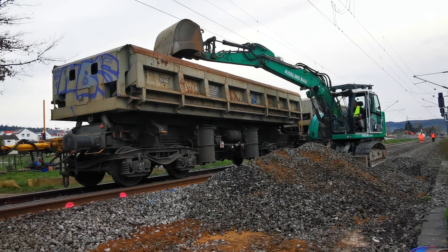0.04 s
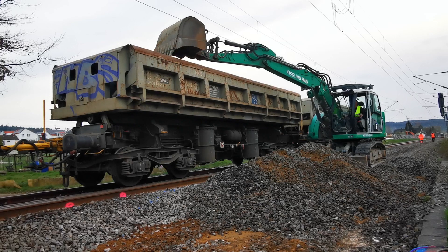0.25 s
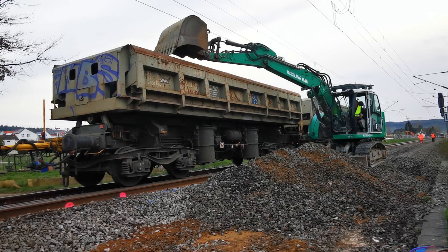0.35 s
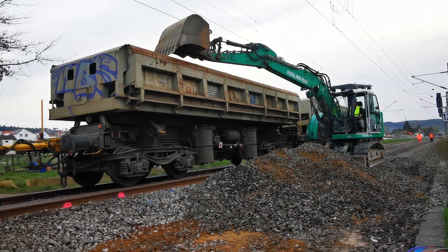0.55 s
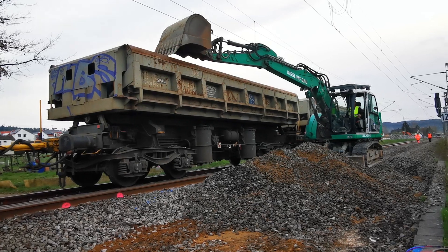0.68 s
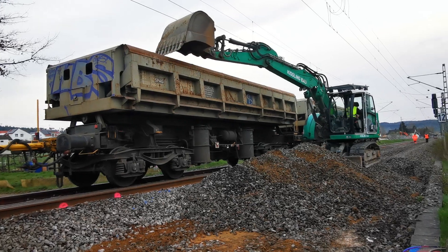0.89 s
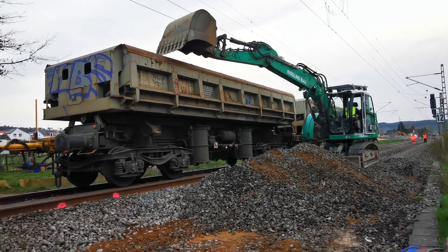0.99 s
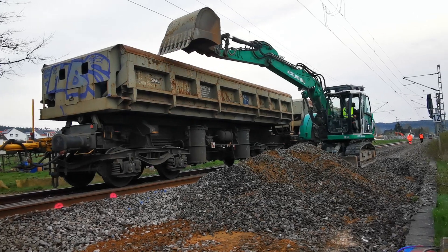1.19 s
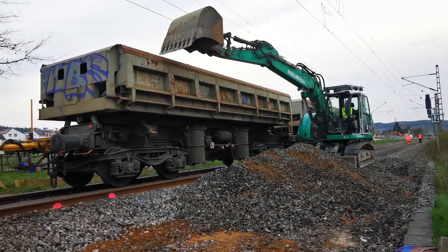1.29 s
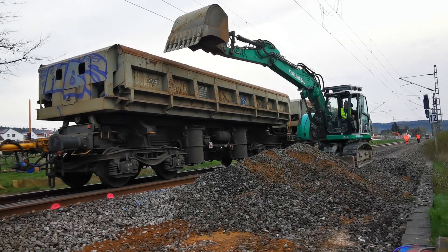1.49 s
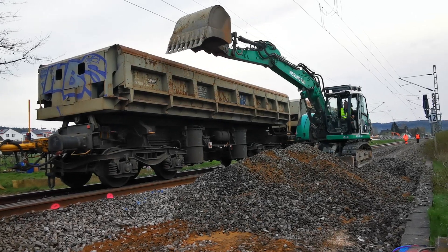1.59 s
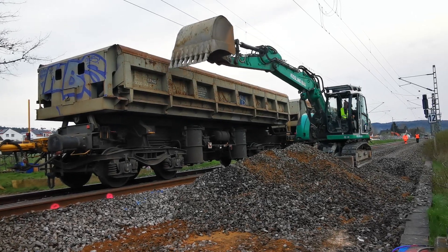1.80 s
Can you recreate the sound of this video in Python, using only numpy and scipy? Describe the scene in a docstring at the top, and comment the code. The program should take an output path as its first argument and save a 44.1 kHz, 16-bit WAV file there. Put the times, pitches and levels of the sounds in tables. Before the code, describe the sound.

Stones slide softly from an excavator bucket, then crash into an empty steel wagon with a boom and ringing clang. A few last stones rattle out while a diesel engine idles faintly, outdoors and slightly to the left.

```python
"""A soft slide of stones, then a clatter: an excavator tips track ballast into an empty steel wagon.
The bulk lands in two heavy loads that make the floor boom and the walls clang, and the last stones
ring in the bucket. Hails of tiny impacts drive the steel's modes and bands of dense ringing.
Underneath, a diesel engine idles and the hydraulics whine faintly. All is outdoors, a little to the left."""
import sys
import numpy as np
from scipy import signal
from scipy.fft import rfft, irfft, next_fast_len
from scipy.io import wavfile

SR = 44100
rng = np.random.default_rng(int(sys.argv[2]) if len(sys.argv) > 2 else 0)


def digitize_waveform(pressure):
    """Quantize a signal to 16-bit integers and store it at the path in sys.argv[1].

    Rows of a 2-D input are taken as channels; values are limited to [-1, 1].
    """
    field = np.atleast_2d(pressure).T
    bounded = np.clip(field, -1, 1)
    quanta = np.round(bounded * 32767).astype(np.int16)
    wavfile.write(sys.argv[1], SR, quanta)


N = 81585
T = np.arange(N) / SR

# masses of ballast landing in the wagon: start_s, rise_s, fade_db_per_s, floor_db, wall_db
LOADS = [(0.21, 0.03, 35, -48, -34), (.289, 0.0049, 78, -41, -29.5), (0.319, 0.01, 69, -15, -20),
         (0.434, 0.0017, 55.5, -15, -18.5), (0.528, 0.029, 59, -15.5, -24.5), (.799, 0.0033, 110, -54, -45),
         (0.848, 0.0067, 117, -27.5, -38), (0.919, 0.0065, 132, -54, -27)]
# lasting tones of the steel plates: pitch_hz, level_db, t60_s
FLOOR_MODES = [(57, -4.5, 0.21), (74.5, -7, .35), (100.5, -12.5, 0.54), (115.1, -6.5, 0.49),
               (173, -7.5, 0.27), (205.8, 0.5, 0.48), (223.5, 2, 0.61), (262.2, -4, .3), (301.4, -4, 0.31)]
WALL_MODES = [(470.4, 5, 1), (557.7, 8, 0.85), (584, 9.5, 0.2), (642, -9, .5), (772, -4, 0.85),
              (864, 1, 0.13), (930, -24, .4), (970, -9, .5), (1030, 2.5, 0.2), (1115, 0.5, 0.56),
              (1304, 2.5, 0.17), (1320, -10, .3), (1570, -13, 0.14), (1980, -9, 0.39)]
# dense wash of ringing around those tones: freq_hz, density_db
FLOOR_SPECTRUM = [(30, -35), (52, -9), (85, -10), (115, 5), (150, -7), (230, 4), (300, -2), (390, -12),
                  (600, -43)]
WALL_SPECTRUM = [(200, -20), (330, -0.5), (430, -6), (580, 5.5), (680, 4.5), (850, -0.5), (1150, -10),
                 (1700, -21), (3000, -26)]

def wagon():
    """The body of the crash: each load drums on the floor and clangs on the walls."""
    floor = flow([(s, rise, fade, db) for s, rise, fade, db, _ in LOADS])
    wall = flow([(s, rise, fade, db) for s, rise, fade, _, db in LOADS])
    boom = plate(FLOOR_SPECTRUM, FLOOR_MODES, lambda hz: floor, ring_db=-6.5)
    clang = plate(WALL_SPECTRUM, WALL_MODES, lambda hz: wall, ring_db=-6.5)
    return boom + clang


# big lumps hitting the floor: start_s, level_db
THUMPS = [(0.33, -12), (.350, -12), (0.439, -12), (.866, -19)]

def thumps(push_s=0.0063, radiates_above_hz=34):
    """The low-end weight: big lumps give the floor a soft push that sets all its modes going."""
    push = sum(from_db(db) * np.sin(np.pi * np.clip((T - s) / push_s, 0, 1)) ** 2 for s, db in THUMPS)
    push *= 2 / (push_s * SR)   # each pulse's area equals its gain
    boom = sum(from_db(db) * ring(push, hz, t60) for hz, db, t60 in FLOOR_MODES)
    return signal.sosfilt(signal.butter(2, radiates_above_hz, "high", fs=SR, output="sos"), boom)


# single big stones striking a wall: start_s, level_db, brightness_db_per_octave
CRACKS = [(.210, -35.5, 8), (.293, -25, 0.5), (0.324, -16.5, -4), (0.435, -16, 1), (0.8, -29, -19),
          (0.826, -26.5, -12), (0.919, -23, -11), (.957, -48, 5.5)]
# tone colour of a crack: freq_hz, density_db
CRACK_SPECTRUM = [(250, 2), (400, -11), (620, 3.5), (1200, -3.5), (2500, -18), (3400, -8), (4400, -9.5),
                  (5500, -31), (7200, -34), (10000, -73)]

def cracks(rise_s=0.0024, fade_db_per_s=420, tilt_above_hz=610):
    """The attack: big stones hit the wall in short bursts, from a bright clink to a dull knock."""
    def envelope(hz):
        octaves = np.log2(max(hz / tilt_above_hz, 1))
        return flow([(s, rise_s, fade_db_per_s, db + bright * octaves) for s, db, bright in CRACKS])
    return banded(CRACK_SPECTRUM, 0.75, envelope)


# showers of stone: start_s, rise_s, fade_db_per_s, level_db, brightness_db_per_octave
SPILLS = [(0.205, 0.011, 116, -23.5, 1), (0.25, 0.0092, 105, -29.5, 5.5), (0.288, 0.0054, 88, -21.5, -6),
          (0.319, 0.0091, 100, -19, -5.5), (.358, 0.011, 185, -25.5, 1.5), (0.432, 0.0023, 111, -18.5, 0),
          (0.472, 0.0066, 132, -23, 5), (0.519, 0.022, 109, -27.5, -6), (0.864, 0.011, 95, -48.5, 5.5),
          (0.913, 0.0052, 151, -39.5, -3.5), (0.953, 0.0027, 226, -53.5, 12)]
# clinks of stone on steel: pitch_hz, level_db, t60_s
CLINK_MODES = [(1138, -9, .1), (1408, 0, 0.05), (2260, -5, 0.023), (2815, 8.5, 0.043), (4070, -11, 0.02),
               (4280, -1, 0.024)]
# puffs of fine grit: start_s, rise_s, fade_db_per_s, level_db
GRIT_PUFFS = [(.288, 0.0057, 102, -34.5), (.355, .015, 146, -51), (.48, 0.035, 140, -42),
              (.868, 0.018, 90, -55.5)]
# tone colours of rattling stone and hissing grit: freq_hz, density_db
STONE_SPECTRUM = [(400, -18.5), (900, -4), (1400, 1.5), (1900, -3.5), (3000, -2), (4500, -4), (5500, -20.5),
                  (7200, -14.5), (9000, -28.5), (12000, -40), (15500, -58)]
GRIT_SPECTRUM = [(4000, -8), (7000, 7.5), (9500, -3), (13000, -1.5), (16000, -19)]

def clatter(pivot_hz=2315, fade_exponent=0.36):
    """Stones rattle on steel and each other; the treble dies first as the heap cushions them."""
    def envelope(hz):
        ratio = hz / pivot_hz   # a spill's fade and level hold at the pivot and tilt around it
        return flow([(s, rise, fade * ratio ** fade_exponent, db + bright * np.log2(ratio))
                     for s, rise, fade, db, bright in SPILLS])
    stones = plate(STONE_SPECTRUM, CLINK_MODES, envelope, ring_db=-10)
    puffs = flow(GRIT_PUFFS)
    grit = banded(GRIT_SPECTRUM, 1, lambda hz: puffs)
    return inside_wagon(stones + grit)


def inside_wagon(dry, t60_s=0.044, echo_db=-2):
    """Quick reflections between the steel walls blur each contact."""
    age = T[:SR // 8]
    tail = rng.standard_normal(len(age)) * np.exp(-np.log(1000) * age / t60_s)
    echoes = signal.fftconvolve(dry, tail[None] / np.linalg.norm(tail))[:, :N]
    wet = from_db(echo_db)
    return (dry + wet * echoes) / np.sqrt(1 + wet ** 2)


# tone colour of stones sliding in the bucket: freq_hz, density_db
SLIDE_SPECTRUM = [(300, -28), (700, -1), (2000, -6), (4500, -10), (5600, -45), (7200, -23), (11000, -43)]
# level curve of the slide: time_s, level_db
SLIDE_LEVEL = [(0, -44.5), (.04, -50.5), (.12, -51.5), (.2, -51.5), (.6, -54)]
# the last stones scraping out: start_s, rise_s, fade_db_per_s, level_db
LAST_STONES = [(.80, 0.012, 75, -29), (.916, 0.007, 60, -31.5), (.955, 0.01, 148, -28.5),
               (1.085, 0.017, 400, -56)]
# hollow tones of the bucket: pitch_hz, level_db, t60_s
BUCKET_MODES = [(116, 2, 0.22), (186.3, -0.5, .25), (563, -4, 0.18), (630.3, -3.5, 0.17),
                (655.5, -6.5, 0.14)]

def bucket():
    """Ballast slides as the bucket tips; nearly empty, it rings hollow under the last stones."""
    slide, scrape = in_time(SLIDE_LEVEL), flow(LAST_STONES)
    return banded(SLIDE_SPECTRUM, contacts(), lambda hz: slide) + pelted(BUCKET_MODES, lambda hz: scrape)


# harmonics of the engine's hum: firing_multiple, level_db
ENGINE_ORDERS = [(1, -59), (2, -54.5), (3, -70.5), (6, -68)]
# engine noise and hiss: freq_hz, density_db
ENGINE_SPECTRUM = [(18, -36), (30, -9.5), (75, 0.5), (88, -4), (97, -13), (117, -7), (152, -2.5),
                   (225, -9.5), (249, -16), (341, -4), (432, -20), (492, -7.5), (591, -15), (639, -19),
                   (691, -5), (747, -21.5), (921, -24), (1770, -17.5), (2360, -31), (4310, -47),
                   (5450, -26.5), (7260, -25.5), (15500, -33)]

def diesel(firing_hz=37.4, wander=0.012, throb_db=7, knock_depth=0.52, noise_db=-50.5):
    """An idling diesel: a throbbing hum, and noise that pulses with each firing under a steady hiss."""
    phase = 2 * np.pi * np.cumsum(firing_hz * (1 + wander * drift(8.56))) / SR
    hum = sum(from_db(db + throb_db * drift(8.97)) * np.sin(order * phase + rng.uniform(0, 2 * np.pi))
              for order, db in ENGINE_ORDERS)
    knock = 1 + knock_depth * np.sin(phase)
    noise = banded(ENGINE_SPECTRUM, 0.89, lambda hz: knock if hz < 5000 else 1)
    return np.sqrt(2) * hum + from_db(noise_db) * noise


# level curve of the pump: time_s, level_db
WHINE_LEVEL = [(0, -72), (1.0, -63), (1.3, -57), (1.85, -58)]

def hydraulic_pump(pitch_hz=747, wander=0.0029):
    """The pump's thin, slightly wavering whine creeps up in level."""
    phase = 2 * np.pi * np.cumsum(pitch_hz * (1 + wander * drift(26.1))) / SR
    return np.sqrt(2) * in_time(WHINE_LEVEL) * np.sin(phase)


# tone colour of the valves: freq_hz, density_db
CHATTER_SPECTRUM = [(1100, -24), (1500, -15), (1950, 19), (2500, -21), (3800, -37), (4500, 15.5),
                    (5200, -34)]

def valve_chatter(level_db=-65, swing_db=5.5):
    """Valves chatter faintly: two bright peaks of noise that flicker unevenly."""
    flicker = from_db(level_db + swing_db * drift(per_s=27))
    return banded(CHATTER_SPECTRUM, 0.9, lambda hz: flicker)


def plate(spectrum, modes, envelope, ring_db):
    """A pelted steel plate: dense ringing and a few distinct modes."""
    return banded(spectrum, contacts(), envelope) + from_db(ring_db) * pelted(modes, envelope)


def contacts(stones_per_s=3500, spread_db=1.5):
    """A random hail of stone contacts of uneven size; rms 1."""
    sizes = from_db(spread_db * np.minimum(rng.exponential(1, N), 4))
    hail = sizes * (rng.random(N) < stones_per_s / SR)
    return hail / np.sqrt(np.mean(hail ** 2) + 1e-20)


def pelted(modes, envelope):
    """Steel modes under a hail of stones of strength envelope(hz); rms about 1 before the envelope."""
    hail = contacts()
    total = np.sqrt(sum(from_db(db) ** 2 for _, db, _ in modes))
    out = np.zeros((2, N))
    for hz, db, t60 in modes:
        decay_trim = 2 * np.sqrt(np.log(1000) / (t60 * SR))   # equal power for long and short rings
        out += from_db(db) / total * decay_trim * ring(pair(hail, hz) * envelope(hz), hz, t60)
    return out


def ring(force, hz, t60):
    """One mode: a unit click starts a decaying tone of height 1."""
    radius, angle = np.exp(-np.log(1000) / (t60 * SR)), 2 * np.pi * hz / SR
    return signal.lfilter([.5, 0, -.5], [1, -2 * radius * np.cos(angle), radius ** 2], force + 1e-18)


def banded(spectrum, drive, envelope):
    """Stereo noise in quarter-octave bands, each scaled by the drive and by envelope(hz)."""
    edges = 22 * 2 ** (np.arange(39) / 4)
    centres = np.sqrt(edges[1:] * edges[:-1])
    inside = (centres >= spectrum[0][0]) & (centres <= spectrum[-1][0])
    gains = from_db(at_hz(spectrum, centres)) * inside
    gains /= np.sqrt(np.sum(gains ** 2 * np.diff(edges)) * 2 / SR)   # the spectrum sets colour only
    out = np.zeros((2, N))
    for k in np.flatnonzero(inside):
        band = signal.butter(2, edges[k:k + 2], "band", fs=SR, output="sos")
        out += gains[k] * signal.sosfilt(band, pair(drive, centres[k]) * envelope(centres[k]) + 1e-18)
    return out


def flow(falls):
    """Joint envelope of falls of stone: each rises quickly, then fades; their powers add."""
    times, power = T[::32], 0
    for start_s, rise_s, fade_db_per_s, level_db in falls:
        age = times - start_s
        attack = np.clip(age / rise_s, 0, 1)
        decay = from_db(level_db - fade_db_per_s * np.maximum(age - rise_s, 0))
        power += (attack * decay) ** 2
    return np.interp(T, times, np.sqrt(power))


# stereo image, narrow in the bass and wide on top: freq_hz, left_right_correlation
LIKENESS = [(40, .999), (280, 1), (430, 0.84), (560, 0.98), (1000, 1), (1400, 1), (2000, 0.22),
            (3700, 0.18), (6000, .05)]

def pair(drive, hz):
    """Each contact reaches the two microphones with its own sign and strength, more alike in the bass."""
    alike = np.clip(at_hz(LIKENESS, hz), 0, .999)
    mid, side = rng.standard_normal((2, N)) * drive
    return np.sqrt((1 + alike) / 2) * mid + np.sqrt((1 - alike) / 2) * side * np.array([[1], [-1]])


def heard_from_left(x, lead):
    """The right microphone lags the left by lead(hz) radians."""
    return np.array([x[0], filtered(x[1], lambda hz: np.exp(-1j * lead(hz)))])


def filtered(x, response):
    """Apply a smooth response(hz)."""
    size = next_fast_len(N + SR // 4)
    hz = np.maximum(np.fft.rfftfreq(size, 1 / SR), 1)
    return irfft(rfft(x, size) * response(hz), size)[..., :N]


def drift(per_s):
    """Random wander that glides to a new value per_s times a second."""
    knots = rng.standard_normal(200)
    return np.interp(T * per_s, np.arange(len(knots)), knots)


def in_time(curve):
    """Gain that follows a curve of time_s, level_db."""
    return from_db(np.interp(T, *np.transpose(curve)))


def at_hz(curve, hz):
    """Read a curve on a log-frequency axis."""
    freqs, values = np.transpose(curve)
    return np.interp(np.log(hz), np.log(freqs), values)


def from_db(db):
    """Decibels to gain."""
    return 10 ** (np.asarray(db) / 20)


# how far the crash leads in the left channel: freq_hz, lead_rad
CRASH_LEAD = [(60, .03), (250, 0.23), (400, 0.59), (570, 0.19), (900, 1.59), (1600, 1.7), (4000, 2.43)]

def scene():
    """The crash, with the excavator running on beneath it, both placed to the left."""
    def machine_lead(hz):
        lead_ms = np.interp(hz, [700, 1100], [0.36, 0.607])
        return 2 * np.pi * hz * lead_ms / 1000
    crash = wagon() + thumps() + cracks() + clatter() + bucket()
    machine = diesel() + hydraulic_pump() + valve_chatter()
    return heard_from_left(crash, lambda hz: at_hz(CRASH_LEAD, hz)) + heard_from_left(machine, machine_lead)


# colour of the microphone pair: freq_hz, left_minus_right_db
MIC_BALANCE = [(60, 0.2), (310, -1.7), (470, 3), (770, -3), (1080, 0.6), (1400, -1.5), (2400, -0.5),
               (4000, -1), (5300, 0), (6900, -7), (9500, 5.5), (15500, 3.5)]

def record(dry, cutoff_hz=15750):
    """The two microphones differ in colour; the highest peaks are rounded and the top is cut."""
    coloured = filtered(dry, lambda hz: from_db(at_hz(MIC_BALANCE, hz) / 2 * np.array([[1], [-1]])))
    rounded = coloured / (1 + coloured ** 6) ** (1 / 6)
    return signal.sosfilt(signal.ellip(12, .1, 80, cutoff_hz, fs=SR, output="sos"), rounded)


dry = scene()
out = record(dry)
digitize_waveform(out)
```